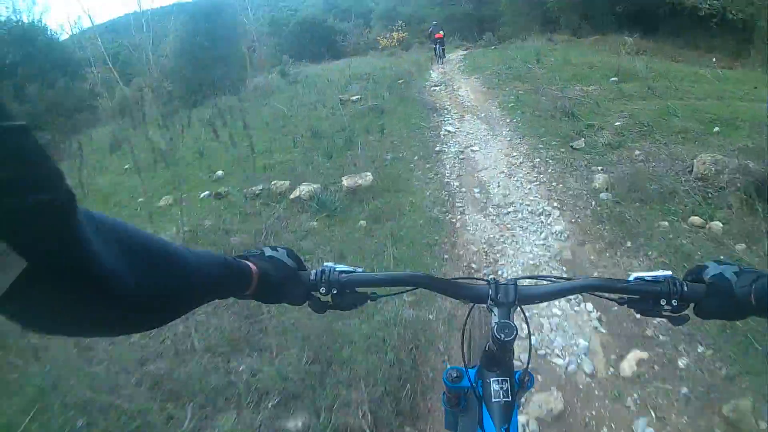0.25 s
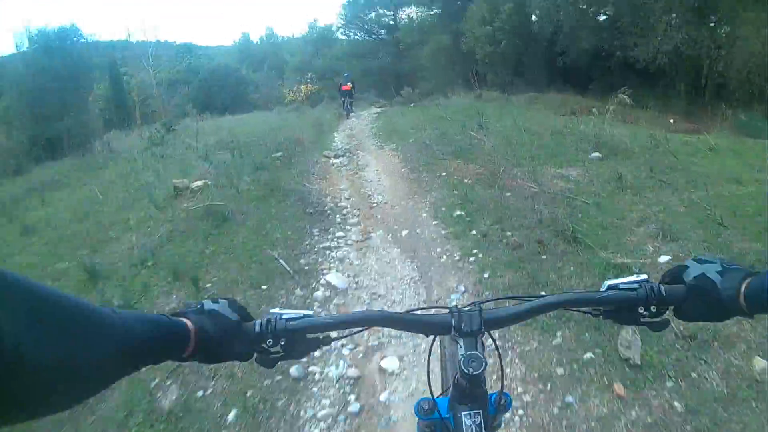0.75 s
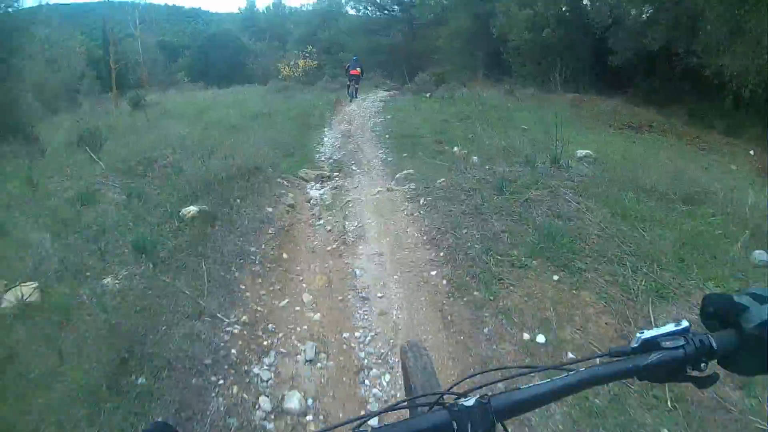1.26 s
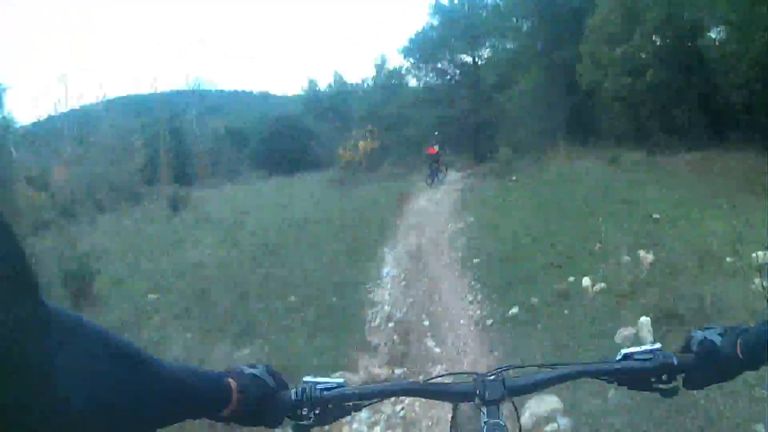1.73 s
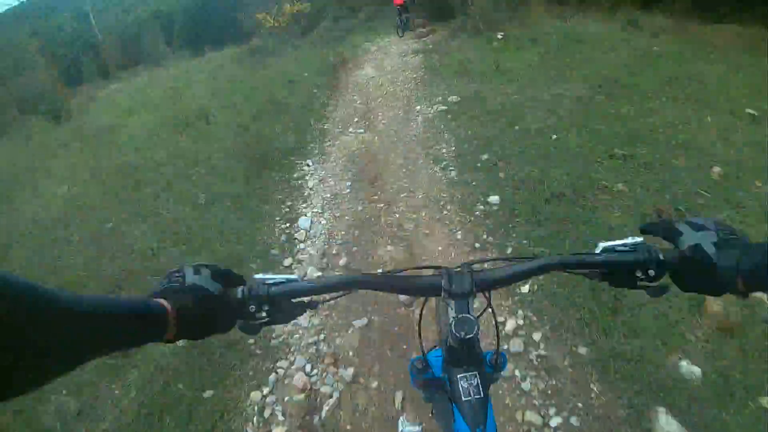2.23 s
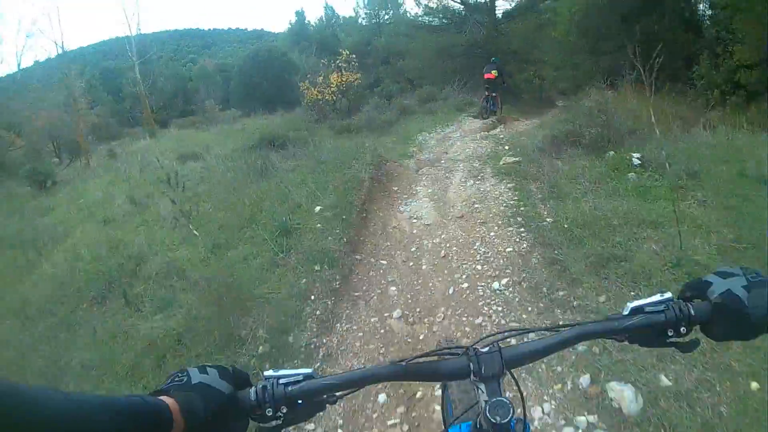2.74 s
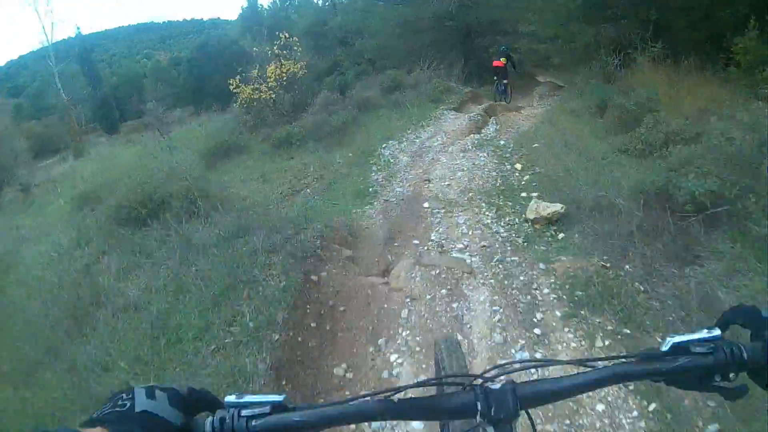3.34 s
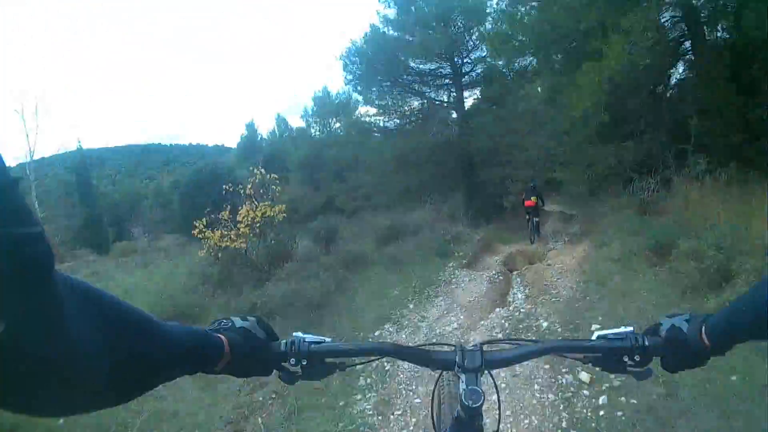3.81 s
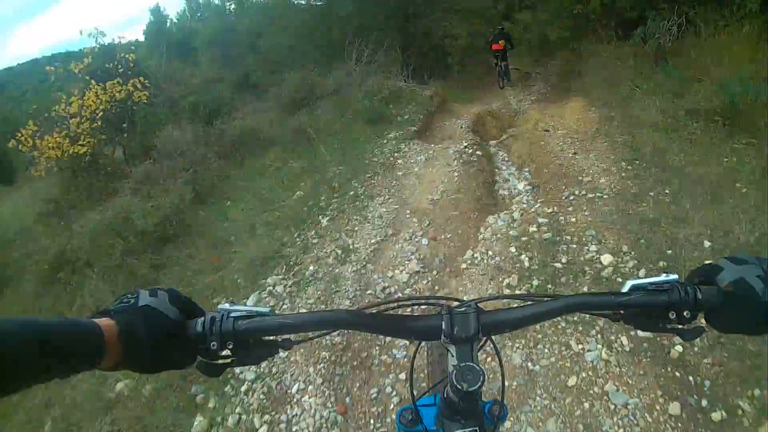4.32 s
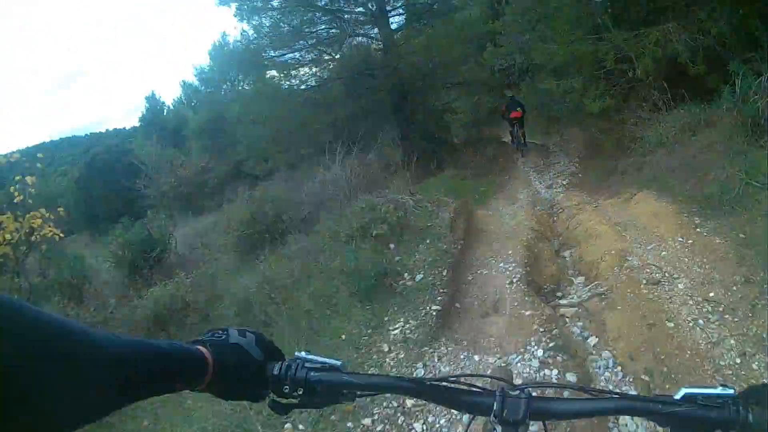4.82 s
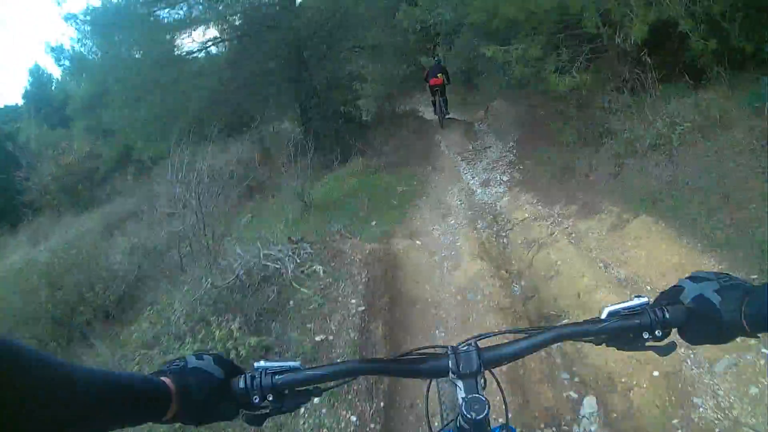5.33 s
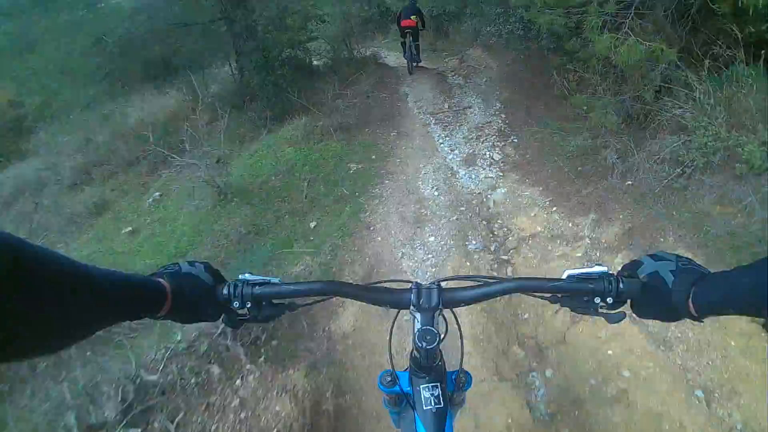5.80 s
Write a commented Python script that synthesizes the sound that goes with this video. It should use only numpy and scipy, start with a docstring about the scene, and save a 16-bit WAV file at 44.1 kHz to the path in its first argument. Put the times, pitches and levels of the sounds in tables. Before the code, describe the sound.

Muffled gravel crunch and ticking stones under a mountain bike, with close clacks, rattles and dull thuds at each bump.

```python
"""A sharp click, then muffled crunching, scrapes and knocks: a mountain bike rolls down a rocky trail,
heard from a camera in a closed case on the rider's chest. The tyres crunch over gravel and tick on stones.
Jolts bring short scrapes and dull thuds; hard bumps knock bike and mount, so that the case rings.
The loudest knocks overload the microphone, whose seal cuts bass and treble."""
import sys
import numpy as np
from scipy import signal
from scipy.fft import rfft, irfft
from scipy.io import wavfile

SR = 44100
rng = np.random.default_rng(int(sys.argv[2]) if len(sys.argv) > 2 else 0)


def wrap_up_sound(samples):
    """Save the sound to the file named by the first command line argument, as 16-bit audio."""
    columns = np.atleast_2d(samples).T
    # keep every value between -1 and 1, then stretch to whole-number steps
    tamed = np.clip(columns, -1, 1)
    steps = np.round(tamed * 32767).astype(np.int16)
    wavfile.write(sys.argv[1], SR, steps)


N = 267246
TIME_S = np.arange(N) / SR

# First row: a sharp click with a brief ring as the sound cuts in. Later rows: bike and mount knock.
# Each row: start in seconds, strength in dB, ring in Hz, t60 in seconds, clack and thud lift in dB.
HITS = [(0.001, -10, 1243, 0.023, 3.5), (0.3113, -15.5, 1160, 0.021, -7), (0.3389, -26.5, 1150, 0.027, -46),
        (0.395, -31, 980, 0.026, -15), (0.6549, -24.5, 1203, 0.021, -17), (0.8271, -13, 750, 0.0093, -20),
        (0.8324, -11, 1254, 0.0017, -1.5), (0.8386, -17.5, 780, 0.027, -18),
        (0.9297, -20, 1210, 0.021, -16.5), (0.9868, -26, 1244, 0.028, -2.5), (1.32, -39, 1290, 0.019, -7),
        (1.4547, -8, 1117, 0.0088, -20), (1.4844, -29, 1335, 0.016, -6), (1.5086, -31, 1222, 0.012, 10.5),
        (1.551, -27.5, 818, 0.039, -12), (1.611, -16.5, 1290, 0.013, -13), (1.622, -10, 1276, 0.011, -14),
        (1.6972, -2.5, 857, 0.038, -37), (1.888, -28.5, 1296, 0.011, -3), (2.1125, -13.5, 1136, 0.034, -26),
        (2.1166, -10.5, 870, 0.026, -14), (2.3929, -31.5, 1227, 0.014, -20),
        (2.4195, -35.5, 1240, 0.007, 3), (2.75, -24, 810, 0.035, -20.5), (3.0267, -26.5, 1160, 0.019, -23),
        (3.1563, -34, 820, 0.028, 3), (3.547, -20, 763, 0.025, -7), (3.5618, -9.5, 788, 0.014, -14),
        (3.5983, -31, 818, 0.019, -11), (3.863, -32, 1180, 0.013, -25), (3.8857, -26.5, 810, 0.022, -16),
        (3.9327, -14, 840, 0.0083, -21.5), (3.9387, -19.5, 820, 0.0066, -14), (3.972, -31, 924, 0.022, -22),
        (3.9797, -20.5, 950, 0.0095, -30), (4.1089, -14.5, 802, 0.02, -11), (4.1349, -18, 805, 0.05, 5.5),
        (4.1596, -23, 840, 0.017, -22), (4.165, -23, 1080, 0.063, 8), (4.288, -23, 1071, 0.012, -23.5),
        (4.3376, -18, 1152, 0.0056, -29), (4.3649, -20.5, 694, 0.013, -10), (4.454, -31, 866, 0.012, -4.5),
        (4.5253, -13.5, 927, 0.017, -16.5), (4.9833, -24, 780, 0.02, -18), (5.033, -25, 1144, 0.019, -23),
        (5.0934, -17.5, 780, 0.02, -23), (5.115, -18.5, 1150, 0.032, -8),
        (5.1739, -11.5, 1000, 0.011, -6.5), (5.1821, -10, 1174, 0.06, -27), (5.229, -21, 813, 0.011, -2.5),
        (5.2399, -18.5, 1243, 0.058, -23), (5.9972, -30.5, 805, 0.015, -27)]
# Spectrum of a thud through the frame. Each row: frequency in Hz, gain in dB.
THUD_SPECTRUM = [(25, -14), (80, -1.5), (150, 5), (400, 5.5), (700, -2.5), (1500, -28), (5000, -51)]
# Case resonances that colour noise. Each row: centre in Hz, width in Hz, lift in dB.
CASE_PEAKS = [(780, 43, 4.5), (900.6, 28, 4.5), (1213, 170, 4), (2045, 53, 2), (3500, 190, 2.5),
              (7900, 420, 6.5)]
# Modes of the struck case. Each row: frequency in Hz, level in dB, t60 in seconds.
CASE_MODES = [(795, -0.5, 0.014), (861, -6.5, 0.013), (1195, -1, .03), (1660, -8, 0.025),
              (2070, -9.5, 0.028), (3470, -12.5, 0.015)]


def gain_of(db):
    """Decibels to amplitude."""
    return 10 ** (np.asarray(db) / 20)


def unit_rms(x):
    """Scales to rms 1."""
    return x / np.sqrt(np.mean(x ** 2) + 1e-20)


def add(mix, start_s, sound):
    """Mixes a sound in at start_s."""
    part = mix[max(round(start_s * SR), 0):][:len(sound)]
    part += sound[:len(part)]


def response(spectrum, peaks=(), size=4096):
    """Minimum-phase impulse response of a spectrum plus resonant peaks."""
    hz = np.abs(np.fft.fftfreq(size, 1 / SR))
    point_hz, point_db = np.transpose(spectrum)
    db = np.interp(np.log(hz + 1), np.log(point_hz + 1), point_db)
    for centre_hz, width_hz, lift_db in peaks:
        db += lift_db / (1 + (2 * (hz - centre_hz) / width_hz) ** 2)
    log_spectrum = np.conj(signal.hilbert(np.log(gain_of(db))))
    return np.fft.ifft(np.exp(log_spectrum)).real[:size // 2]


def colour(x, spectrum, peaks=()):
    """Filters by a spectrum plus peaks."""
    return signal.oaconvolve(x, response(spectrum, peaks))[:N]


def split(x, low_hz=400, high_hz=1600):
    """Bass, middle and treble, scaled so that the middle has rms 1."""
    below = lambda hz: signal.sosfiltfilt(signal.butter(2, hz, fs=SR, output="sos"), x)
    bass, treble = below(low_hz), x - below(high_hz)
    middle = x - bass - treble
    return np.array([bass, middle, treble]) / np.std(middle)


def wander(hz):
    """Smooth noise of rms 1, rolling off above hz."""
    rolloff = 1 + (np.fft.rfftfreq(N, 1 / SR) / hz) ** 4
    return unit_rms(irfft(rfft(rng.standard_normal(N)) / rolloff, N))


def arch(middle_s, length_s):
    """Half a sine wave, centred on middle_s."""
    return np.cos(np.pi * np.clip((TIME_S - middle_s) / length_s, -0.5, 0.5))


def grains(per_s, spread_db, hiss):
    """Tiny impacts of uneven size over a fine hiss."""
    size = gain_of(spread_db * np.minimum(rng.exponential(1, N), 4)) * rng.choice([-1, 1], N)
    return unit_rms(size * (rng.random(N) < per_s / SR)) + hiss * rng.standard_normal(N)


def ringing_hits(rows, contact_s=0.00069, grind_s=0.0016, settle_s=0.0011, rebound_s=0.0035):
    """A gritty clack and a thud start each hit; a short ring sags in pitch and rebounds once."""
    # Clack spectrum. Each row: frequency in Hz, gain in dB.
    clack_spectrum = [(100, -21.5), (500, -8.5), (850, -2), (1300, 6), (2000, 2.5), (3500, -4), (4500, -12),
                      (5500, -24), (15000, -41)]
    clack_db, thud_db, rebound_db = 20.5, -14, -8
    sharp, choke = 0.18, 1.18  # the ring starts sharp and is damped ever faster
    t, out = np.arange(SR // 8) / SR, np.zeros(N)
    click, thud = response(clack_spectrum, CASE_PEAKS), response(THUD_SPECTRUM)
    low_cut = signal.butter(2, 450, "highpass", fs=SR, output="sos")  # the rings carry no bass below about 450 Hz
    phase_per_hz = 2 * np.pi * np.cumsum(1 + sharp * np.exp(-t / settle_s)) / SR
    for start_s, db, ring_hz, t60_s, hardness_db in rows:
        noise = rng.standard_normal(len(t))
        late, detune = noise[-2:]
        fade = (1 - np.exp(-t / contact_s)) * np.exp(-np.log(1000) * (t / t60_s) ** choke)
        ring = lambda hz: gain_of(db) * signal.sosfilt(low_cut, fade * np.sin(hz * phase_per_hz))
        rebound = ring(ring_hz * np.exp(0.22 * detune)) * np.exp(-t / rebound_s)
        clack = signal.fftconvolve(noise * np.exp(-t / grind_s), click)
        add(out, start_s, ring(ring_hz))
        add(out, start_s + rebound_s * np.exp(0.3 * late), gain_of(rebound_db) * rebound)
        add(out, start_s, gain_of(db + hardness_db + clack_db) * clack / np.linalg.norm(clack))
        add(out, start_s, gain_of(db + hardness_db + thud_db) * thud / np.abs(thud).max())
    return out


def scrapes(rise_s=0.0044, fall_s=0.005, trim_db=-3):
    """Each jolt sets off dense slips and chatter that ring the case; harder ones are brighter."""
    # Scrapes. Each row: start in seconds, length in seconds, level before trim in dB, bass lift in dB.
    bursts = [(0.004, 0.043, -35.5, -4), (0.294, 0.026, -37, 7), (0.52, 0.022, -36.5, 5.5),
              (0.692, 0.019, -37, 4), (0.774, 0.022, -44.5, 8), (0.826, 0.0096, -26.5, 11.5),
              (0.871, 0.021, -40, 4), (0.96, 0.041, -40.5, -20), (1.102, 0.026, -36, -1.5),
              (1.476, 0.027, -36, -7), (1.599, 0.046, -34.5, -3), (2.078, 0.056, -37.5, -3),
              (2.116, 0.026, -29, -4.5), (2.161, 0.024, -33, 2), (2.24, 0.02, -53, -4.5),
              (2.314, 0.017, -42.5, -14), (3.418, 0.072, -43.5, 2.5), (3.512, 0.056, -38, -7),
              (4.077, 0.029, -36, -9), (4.121, 0.013, -22, 2), (4.159, 0.012, -21, -0.5),
              (4.248, 0.051, -37.5, 6), (4.272, 0.031, -36.5, 5.5), (4.359, 0.058, -37, 6),
              (4.446, 0.088, -37.5, 6), (4.741, 0.032, -35.5, -4.5), (5.053, 0.032, -39, -2.5),
              (5.093, 0.047, -28, -14), (5.169, 0.033, -21, 0), (5.229, 0.019, -22.5, -8),
              (5.357, 0.024, -40.5, 2.5), (5.577, 0.04, -38.5, 4.5), (5.922, 0.022, -35.5, -1.5)]
    # Chatter spectrum. Each row: frequency in Hz, gain in dB.
    spectrum = [(25, -19.5), (70, -13.5), (150, -11), (200, -10), (300, -3), (550, -2.5), (800, 1),
                (1250, 1.5), (1600, 0), (2100, 0), (3000, -10.5), (4300, -9), (5500, -31), (15000, -51.5)]
    chatter = grains(per_s=2500, spread_db=4, hiss=0.5) * gain_of(0.64 * wander(hz=112))
    bass, middle, treble = split(colour(chatter, spectrum, CASE_PEAKS))
    out = np.zeros(N)
    for start_s, length_s, db, bass_db in bursts:
        t = TIME_S - start_s
        attack = np.exp(np.minimum(t - rise_s / 2, 0) / rise_s)
        release = np.exp(-np.maximum(t - length_s + fall_s / 2, 0) / fall_s)
        treble_db = -3 + 0.26 * (db + 34.5)
        rattle = gain_of(bass_db) * bass + middle + gain_of(treble_db) * treble
        out += gain_of(db + trim_db) * attack * release * rattle
    return out


def ground(dirt_treble_db=-6.5, skip_s=0.06, skip_db=-3, skip_treble_db=-5):
    """Level and treble of the crunch in dB: speed, loose gravel, tyres going light over crests."""
    # Base crunch, following speed and ground. Each row: time in seconds, level in dB.
    roll = [(0.05, -45.5), (0.22, -47.5), (0.42, -49.5), (0.9, -45.5), (1.03, -54), (1.15, -50),
            (1.42, -54), (1.58, -46.5), (2.0, -56), (2.24, -45.5), (2.6, -52.5), (3.05, -53), (3.7, -54),
            (4.0, -46), (4.45, -46.5), (4.62, -48), (5.2, -49.5), (6.06, -49)]
    # Loose gravel. Each row: middle in seconds, length in seconds, lift in dB, treble lift in dB.
    patches = [(0.159, 0.1, -3, 10), (0.428, 0.22, 3.5, 4.5), (1.327, 0.046, 5, 5.5),
               (1.833, 0.18, 6.5, 9.5), (1.951, 0.078, 3.5, 8.5), (2.052, 0.068, 1, 7),
               (2.304, 0.06, -1, -1), (2.476, 0.072, 6.5, 9), (2.678, 0.054, 3, 10.5),
               (2.828, 0.16, 4.5, 3), (2.987, 0.055, 5.5, -2), (3.187, 0.076, 4.5, 0.5),
               (3.466, 0.17, 7, 5.5), (3.537, 0.098, 12.5, 12), (3.81, 0.11, 1.5, 6.5),
               (4.053, 0.085, -1.5, 7.5), (4.687, 0.14, -4.5, 8.5), (4.847, 0.12, 2.5, 8),
               (5.282, 0.073, 0.5, 8), (5.467, 0.11, 4, 2.5), (5.82, 0.15, 6.5, 9)]
    # Crests. Each entry: middle in seconds.
    crests_s = [0.218, 0.338, 0.745, 1.03, 1.72, 2.37, 2.735, 2.9, 3.32, 3.7, 4.211, 4.32, 4.599, 5.659,
                5.89]
    unloaded = sum(arch(middle_s, skip_s) for middle_s in crests_s)
    ground_db = np.interp(TIME_S, *np.transpose(roll)) + skip_db * unloaded
    treble_db = dirt_treble_db + skip_treble_db * unloaded
    for middle_s, length_s, lift_db, treble_lift_db in patches:
        patch = arch(middle_s, length_s)
        ground_db += lift_db * patch
        treble_db += treble_lift_db * patch
    return ground_db, treble_db


def tyres(ground_db, treble_db, trim_db=-1, bounce_db=1.24, bounce_treble_db=1):
    """Gravel crunches in clumps under the tread; each small bounce makes it louder and brighter."""
    # Gravel spectrum. Each row: frequency in Hz, gain in dB.
    spectrum = [(25, -15), (70, -17.5), (110, -8), (150, -5.5), (220, -11.5), (500, -7.5), (800, -4),
                (1300, -0.5), (1600, -2.5), (2100, -5.5), (3000, -15), (4300, -15), (5500, -32.5),
                (15000, -54.5)]
    crunch = grains(per_s=1500, spread_db=1, hiss=0.92) * gain_of(2.02 * wander(hz=42.6))
    bass, middle, treble = split(colour(crunch, spectrum, CASE_PEAKS))
    bounce = wander(hz=13)
    treble *= gain_of(treble_db + bounce_treble_db * bounce)
    return gain_of(ground_db + trim_db + bounce_db * bounce) * (bass + middle + treble)


def clatter(ground_db, per_s=6, lift_db=12, spread_db=1.5, t60_s=0.016, hardness_db=-15.5):
    """Two parts knock lightly at random, harder on rougher ground."""
    rows = []
    for i in np.flatnonzero(rng.random(N) < per_s / SR):
        size, part, detune = rng.standard_normal(3)
        db = ground_db[i] + lift_db + spread_db * size
        ring_hz = (1240 if part > 0 else 780) * (1 + 0.029 * detune)
        rows.append((i / SR, db, ring_hz, t60_s, hardness_db))
    return ringing_hits(rows)


def case_ring(weights):
    """One blow on the case: a weighted sum of its decaying modes."""
    t = np.arange(SR // 12) / SR
    return sum(weight * gain_of(db - 60 * t / t60_s) * np.sin(2 * np.pi * hz * t)
               for weight, (hz, db, t60_s) in zip(weights, CASE_MODES))


def stones(ground_db, per_s=45, trim_db=-7.5):
    """Single stones tick under the tyres, each ringing one case mode."""
    ticks = np.zeros(N)
    for mode in np.eye(len(CASE_MODES)):
        struck = rng.random(N) < per_s / len(CASE_MODES) / SR
        taps = struck * gain_of(rng.uniform(-10.5, 0, N))
        ticks += signal.oaconvolve(taps, case_ring(mode))[:N]
    return unit_rms(ticks) * gain_of(ground_db + trim_db)


def afterring(share_db=-19):
    """A faint ring follows each hit, with its own mix of case modes."""
    out = np.zeros(N)
    for start_s, db, *_ in HITS:
        weights = rng.standard_normal(len(CASE_MODES))
        add(out, start_s, gain_of(db + share_db) * case_ring(weights))
    return out


def thuds(trim_db=5):
    """A wheel drops off a stone and pushes dully through the frame."""
    # Wheel drops. Each row: start in seconds, peak before trim in dB.
    drops = [(0.3125, -33), (0.5241, -33), (0.9298, -34.5), (0.9868, -34), (1.4842, -28), (1.5086, -36),
             (1.551, -34.5), (1.611, -29), (2.1168, -31), (2.1285, -28), (2.4195, -37.5), (2.755, -43),
             (3.5618, -30), (4.164, -37), (5.2391, -30.5)]
    out, thud = np.zeros(N), response(THUD_SPECTRUM)
    for start_s, db in drops:
        add(out, start_s, gain_of(db + trim_db) * thud / np.abs(thud).max())
    return out


def frame_hum():
    """A low mode of the bike swells and dies away after a bump."""
    # Bumps. Each row: start in seconds, mode in Hz, level in dB, t60 in seconds.
    bumps = [(1.106, 170, -24.5, 0.053), (1.56, 58, -45, 0.25), (2.128, 144, -45, 0.7)]
    t, out = np.arange(SR) / SR, np.zeros(N)
    for start_s, hz, db, t60_s in bumps:
        envelope = gain_of(db - 60 * t / t60_s) * (1 - np.exp(-t * hz))
        add(out, start_s, envelope * np.sin(2 * np.pi * hz * t))
    return out


def scene():
    """The ground drives tyres, stones and clatter; scrapes, hits and thuds lie on top, close and dry."""
    ground_db, treble_db = ground()
    rolling = tyres(ground_db, treble_db) + stones(ground_db) + clatter(ground_db)
    return (rolling + scrapes() + ringing_hits(HITS) + afterring() + thuds() + frame_hum())[None]


def record(dry, ceiling=0.2, knee=9, noise_db=-97.5, cutoff_hz=15650):
    """The microphone overloads and its seal muffles; then faint self-noise and a band limit."""
    # Response of the sealed microphone. Each row: frequency in Hz, gain in dB.
    seal = [(20, -19.5), (70, -9), (400, -2.5), (850, 0.5), (1250, -2), (1600, -4), (2200, -5.5),
            (2420, -14), (2700, -13.5), (3200, -16), (3500, -13.5), (3800, -19.5), (4350, -22), (5100, -38),
            (6100, -35.5), (7000, -43.5), (7900, -25), (10000, -16.5), (13000, -25.5), (15500, -46)]
    clipped = dry[0] / (1 + np.abs(dry[0] / ceiling) ** knee) ** (1 / knee)
    heard = colour(clipped, seal) + gain_of(noise_db) * rng.standard_normal(N)
    low_pass = signal.firwin(511, cutoff_hz, window=("kaiser", 9), fs=SR)
    return signal.oaconvolve(heard, low_pass, "same")[None]


dry = scene()
out = record(dry)
wrap_up_sound(out)
```